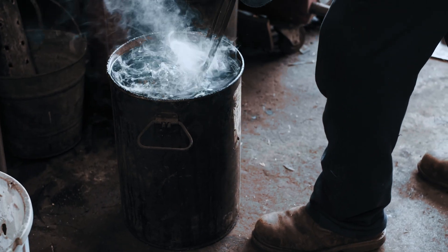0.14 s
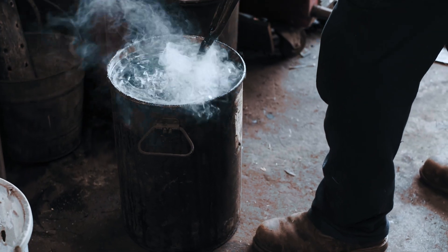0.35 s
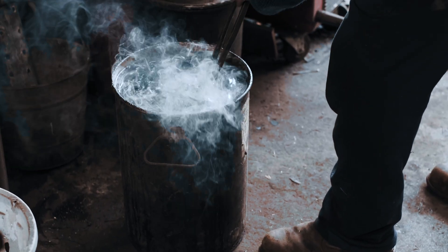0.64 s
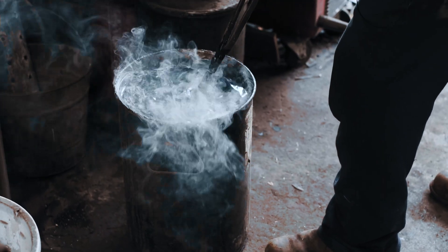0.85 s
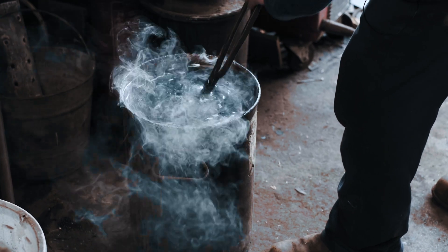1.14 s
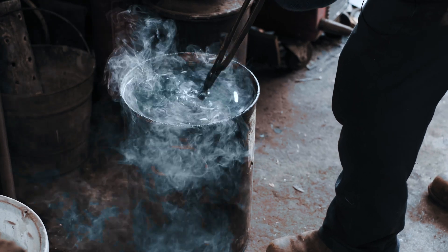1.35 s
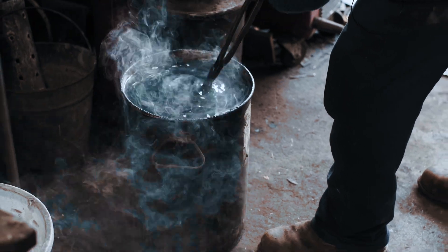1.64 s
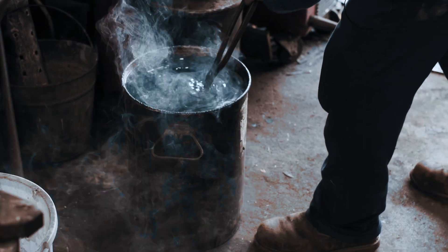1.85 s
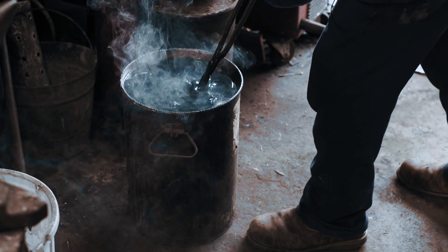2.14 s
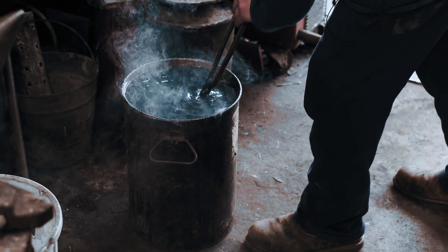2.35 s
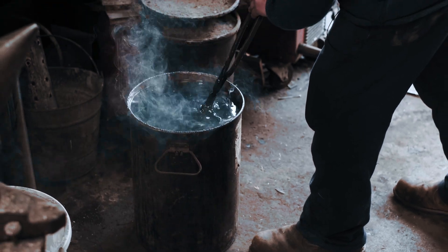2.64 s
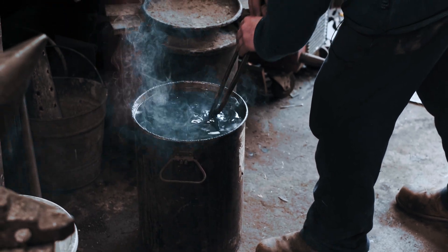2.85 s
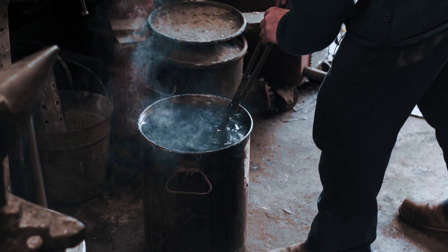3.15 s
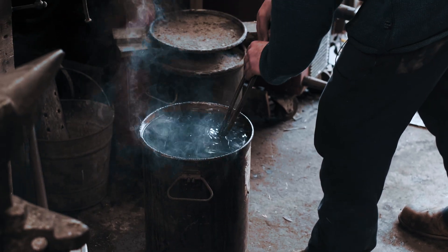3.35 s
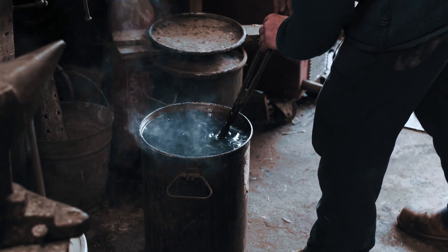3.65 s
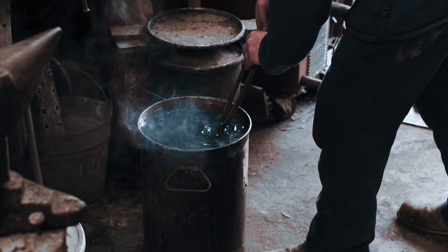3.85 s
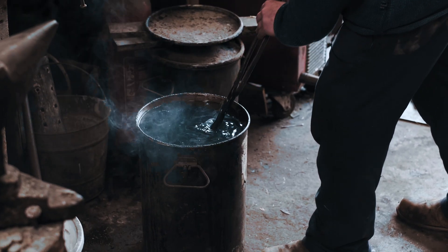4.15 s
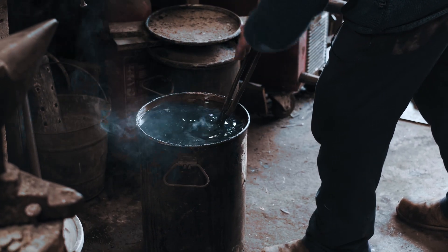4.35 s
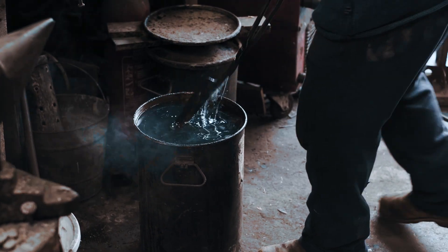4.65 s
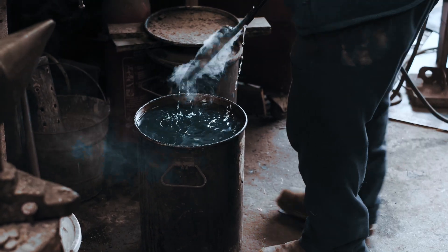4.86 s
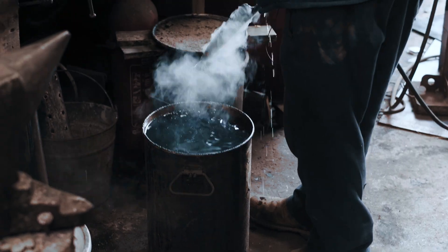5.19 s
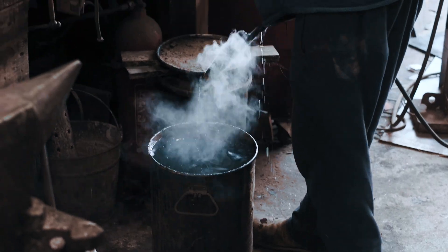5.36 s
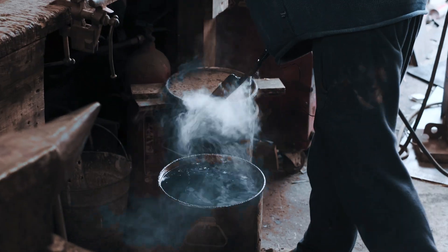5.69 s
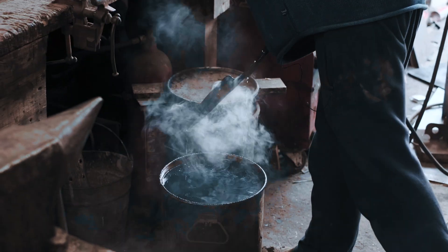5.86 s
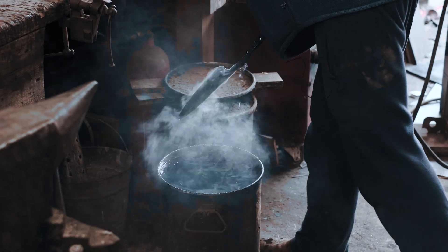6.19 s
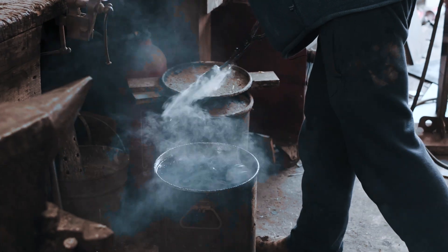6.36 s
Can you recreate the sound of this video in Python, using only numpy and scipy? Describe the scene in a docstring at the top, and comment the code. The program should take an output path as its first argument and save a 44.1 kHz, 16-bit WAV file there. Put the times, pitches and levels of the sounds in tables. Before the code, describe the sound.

A hot steel blade quenched in a drum of oil bubbles, crackles and pops sharply in a workshop, then a hard wooden knock bounces close by.

```python
"""A hot steel blade is stirred in a steel drum of oil in a workshop. A bright spray stops short, then the oil boils
and rumbles: noise shakes the drum's low modes and rising notes bubble. Vapour pockets crackle and pop, ringing
the oil, the steel and the room; the oil's own notes climb as the vapour clears. The blade is lifted and drops
of oil chirp as they fall back. Last, wood is knocked hard close by and bounces. Dull thuds, a blow on the drum,
a splash, shifting feet, room rumble and microphone hiss lie beneath; a gain control turns loud moments down."""
import sys
import numpy as np
from scipy import signal
from scipy.fft import rfft, irfft, next_fast_len
from scipy.io import wavfile
from scipy.ndimage import uniform_filter1d, map_coordinates

SR = 44100
rng = np.random.default_rng(int(sys.argv[2]) if len(sys.argv) > 2 else 0)


def gain_from_decibels(decibels):
    """Convert decibel values to linear amplitude factors."""
    exponent = np.asarray(decibels, float) / 20
    return 10 ** exponent


def unload_audio(sound):
    """Save the sound as a 16-bit wav file, at the path given as the first command line argument."""
    columns = np.transpose(np.atleast_2d(sound))
    # keep every value between -1 and 1, then stretch to whole-number steps
    steps = np.round(np.clip(columns, -1, 1) * 32767)
    wavfile.write(sys.argv[1], SR, steps.astype(np.int16))


N = 287695  # length in samples

# All levels are those ahead of the gain control.
# vapour pockets collapsing at set times, strong and faint, and one low drip-like blip at 4.314 s:
# (t/s, peak level/dB, f/Hz of its own ring)
TIMED_POPS = [(0.101, -34.5, 7976), (0.457, -36, 3390), (0.913, -33, 3040), (1.183, -37, 2620),
              (1.351, -28.5, 3800), (1.45, -30.5, 3120), (1.505, -26.5, 4900), (1.6395, -30.5, 8350),
              (1.7897, -27, 4400), (1.85, -29.5, 4200), (1.956, -36, 6600), (1.9758, -29.5, 8400),
              (2.002, -28.5, 5230), (2.0486, -33, 6400), (2.103, -28, 6246), (2.1527, -33, 6050),
              (2.203, -29.5, 7987), (2.228, -32, 8100), (2.2408, -27, 3100), (2.335, -32, 6444),
              (2.344, -37.5, 3200), (2.4035, -23, 3700), (2.5171, -24, 3590), (2.587, -30, 5200),
              (2.5905, -27, 3640), (2.6438, -32, 8220), (2.6562, -23.5, 3685), (2.671, -31, 4946),
              (2.687, -36, 3700), (2.707, -32.5, 8100), (2.7698, -27, 3920), (2.821, -29.5, 3760),
              (2.8573, -23.5, 8000), (2.895, -28, 8746), (2.913, -30, 7800), (2.966, -26.5, 6266),
              (3.0005, -43, 3708), (3.0688, -26, 5540), (3.1308, -29.5, 3960), (3.152, -32.5, 10750),
              (3.222, -31.5, 5900), (3.233, -24.5, 8107), (3.277, -27.5, 8400), (3.3194, -35, 3938),
              (3.3618, -36.5, 10000), (3.393, -32, 10400), (3.4664, -32, 8800), (3.515, -30.5, 10800),
              (3.561, -30.5, 6411), (3.609, -25.5, 8057), (3.7016, -21, 5280), (3.716, -45, 8200),
              (3.7318, -26.5, 8000), (3.781, -47, 6283), (3.8043, -36, 8000), (3.8134, -28.5, 3130),
              (3.924, -27, 4220), (3.945, -33, 6650), (3.9723, -31.5, 8500), (4.006, -34.5, 11000),
              (4.131, -37.5, 11900), (4.172, -38, 6850), (4.193, -34, 9500), (4.279, -41, 8700),
              (4.314, -44, 2330), (4.335, -41, 7800), (4.4295, -21.5, 5450), (4.452, -37, 5455),
              (4.491, -52, 5262), (4.584, -46.5, 5288)]
# fixed rings of drum and blade: (f/Hz, level/dB, t60/s)
STEEL_RINGS = [(5500, -8, .012), (6100, -8, .012), (7800, -7, .012), (8300, -7, .012), (10600, -11, .012)]
# low modes of the drum wall: (f/Hz, width/Hz)
DRUM_MODES = [(465, 20), (565, 24), (718, 13), (1305, 27)]
# how the oil moves: (t/s, level/dB of boiling and running oil, level/dB of the sizzle)
OIL_FLOW = [(0, -52, -52), (.2, -48.5, -62), (.5, -47, -49), (1, -51, -53.5), (1.4, -56.5, -48.5),
            (1.8, -59, -56), (2.6, -57, -76), (4.4, -56.5, -76.5), (4.8, -56.5, -63.5), (5.1, -52, -68),
            (5.52, -50.5, -55.5), (5.8, -51, -76), (6.52, -51, -52.5)]


def unit(x):
    """Scales a sound to rms 1."""
    return x / np.sqrt(np.mean(x ** 2) + 1e-20)


def along(points, hz):
    """Reads a curve of (f/Hz, value) points on a log frequency axis."""
    f, v = np.transpose(points)
    return np.interp(np.log(hz + 1), np.log(f + 1), v)


def curves(rows):
    """Gives one value per sample for each column after the time."""
    s, *columns = np.transpose(rows)
    return [np.interp(np.arange(N) / SR, s, column) for column in columns]


def wobble(rate):
    """Makes a smooth random curve with rate knots a second."""
    knots = rng.standard_normal(int(N * rate / SR) + 4)
    return map_coordinates(knots, [np.arange(N) * rate / SR])


def filtered(x, response):
    """Multiplies the spectrum of x by a complex response of frequency."""
    m = next_fast_len(x.shape[-1] + 8192)
    spectrum = rfft(x, m) * response(np.fft.rfftfreq(m, 1 / SR))
    return irfft(spectrum, m)[..., :x.shape[-1]]


def band(x, low_hz, high_hz):
    """Keeps a band of frequencies, with a steep lower edge and a gentle upper one."""
    x = signal.sosfilt(signal.butter(5, low_hz, "high", fs=SR, output="sos"), x)
    return signal.lfilter(*signal.butter(1, min(high_hz, SR / 2.2), fs=SR), x)


def rush(spectrum, patchy_db):
    """Makes noise of rms 1 whose gain varies in random patches of time and frequency."""
    z = signal.stft(rng.standard_normal(N), nperseg=512)[2]
    field = uniform_filter1d(rng.standard_normal(z.shape), size=5, axis=0)
    field = uniform_filter1d(field, size=10, axis=1)
    noise = signal.istft(z * gain_from_decibels(patchy_db * unit(field)), nperseg=512)[1][:N]
    return unit(filtered(noise, lambda hz: gain_from_decibels(along(spectrum, hz))))


def ring(modes, t, scatter_db, scatter_rad=1.9):
    """Adds up dying sines, struck at new strengths and phases each time."""
    hz, db, t60 = np.transpose(modes)[:, :, None]
    luck = rng.standard_normal((2, len(modes), 1))
    strength = gain_from_decibels(db + scatter_db * luck[0] - 60 * t / t60)
    return np.sum(strength * np.sin(2 * np.pi * hz * t + scatter_rad * luck[1]), axis=0)


def add(track, s, peak_db, sound):
    """Lays a sound in at time s with the given peak."""
    start = round(s * SR)
    track[start:start + len(sound)] += gain_from_decibels(peak_db) * sound[:len(track) - start] / np.abs(sound).max()


def shop(x):
    """The workshop's answer: a delayed noise tail in which each frequency dies at its own speed."""
    # (f/Hz, t60/s)
    shop_decay = [(150, 0.48), (1000, 0.52), (4000, 0.22), (12000, 0.16)]
    hz, t, z = signal.stft(rng.standard_normal(SR // 2), SR, nperseg=256)
    tail = signal.istft(z * gain_from_decibels(-60 * t / along(shop_decay, hz)[:, None]), SR, nperseg=256)[1]
    delayed = np.pad(x, (SR // 150, 0))
    return signal.fftconvolve(delayed, tail / np.linalg.norm(tail))[:len(x)]


def clearing(s):
    """How far the vapour has cleared at time s, from 0 to 1."""
    clears_at_s, clears_in_s = 2.1, .75
    return 1 - np.exp(-np.maximum(s - clears_at_s, 0) / clears_in_s)


def oil_modes(s):
    """Modes of the oil-filled drum at time s, as (f/Hz, level/dB, t60/s); foam lowers and muffles them."""
    # (multiple of the lowest mode, level/dB in clear oil)
    oil_ratios = [(1, -4), (1.19, -3), (1.5, -9)]
    foamy_hz, clear_hz = 2780, 4390
    foamy_t60, clear_t60 = .024, .066  # s
    clear = clearing(s)
    lowest_hz = foamy_hz + (clear_hz - foamy_hz) * clear
    t60 = foamy_t60 + (clear_t60 - foamy_t60) * clear ** 3
    return [(k * lowest_hz, db - 100 * (k - 1) * (1 - clear), t60) for k, db in oil_ratios]


def oil_ring(x, t60):
    """Passes x through the oil's modes while they glide upward."""
    pole, out = gain_from_decibels(-60 / (t60 * SR)), 0
    for hz, db, _ in oil_modes(np.arange(N) / SR):
        turn = np.exp(2j * np.pi * np.cumsum(hz) / SR)
        # shift the mode down to 0 Hz, let it ring there, then shift it back
        rung = signal.lfilter([np.sqrt(1 - pole)], [1, -pole], x / turn)
        out = out + gain_from_decibels(db) * np.real(turn * rung)
    return out


def pop(s, own_hz):
    """One vapour pocket collapses: a snap and spray, its own ring, the oil's modes and the steel."""
    t = np.arange(SR // 8) / SR
    # the pocket stirs most the oil modes near its own pitch
    oil = [(hz, db - 18 * abs(np.log10(hz / own_hz)), t60) for hz, db, t60 in oil_modes(s)]
    # a ragged push of 5 ms roughens the rings
    shove = rng.standard_normal(SR // 200) * gain_from_decibels(-60 * t[:SR // 200] / 0.017)
    rings = ring(STEEL_RINGS + [(own_hz, 1.5, .014)], t, scatter_db=3.5)
    rings = signal.fftconvolve(rings, shove / np.linalg.norm(shove))[:len(t)]
    # three decays: snap, spray and a faint tail
    fade = gain_from_decibels(12.5 - 60 * t / .004) + gain_from_decibels(6.5 - 60 * t / .016) + gain_from_decibels(-9 - 60 * t / .05)
    crack = band(rng.standard_normal(len(t)) * fade, 0.66 * own_hz, 1.2 * own_hz)
    crack = (crack + ring(oil, t, scatter_db=2)) * (1 - np.exp(-t / .0004))
    return band(rings + crack, .85 * min(own_hz, oil[0][0]), 2 * own_hz)


def chance_pops(count):
    """Draws more collapses: some by chance early on, and three shaken loose by each timed one."""
    until_s, early_db, scatter_db = 1.5, -43, 4
    middle_hz, spread = 8000, 0.285
    after_s, after_db = .022, -16  # mean extra delay and relative level of those shaken loose
    timed = np.repeat(TIMED_POPS, 3, axis=0)
    early = (np.arange(count) + rng.random(count)) / count * until_s
    when = np.r_[early, timed[:, 0] + .008 + rng.exponential(after_s, len(timed))]
    luck = rng.standard_normal((len(when), 2))
    db = np.r_[np.full(count, early_db), timed[:, 1] + after_db] + scatter_db * luck[:, 0]
    hz = np.clip(middle_hz * np.exp(spread * luck[:, 1]), 2500, 12000)
    return list(zip(when, db, hz))


def crackle():
    """Small pockets burst in clumps as short ticks, raised around each timed pop by that pop's strength."""
    # (t/s, base level/dB of the ticks before filtering)
    tick_level = [(0, -57.5), (1, -49), (2, -47.5), (3.5, -54), (4.4, -67), (5.5, -52), (6.52, -90)]
    blade_out_s = 4.62  # the blade leaves the oil and its ticks no longer ring the oil
    time = np.arange(N) / SR
    stir = 0
    for s, db, _ in TIMED_POPS:
        distance = np.where(time > s, (time - s) / 0.0064, (s - time) / 0.0017)
        stir = stir + gain_from_decibels(db + 55.0) * np.exp(-distance)
    level_db = curves(tick_level)[0] + 11 * np.log10(1 + stir)
    ticks_so_far = np.cumsum(380 * gain_from_decibels(5.1 * wobble(14))) / SR
    luck, t = rng.random((3500, 3)), np.arange(SR // 80) / SR
    track = np.zeros(N)
    for k in range(min(int(ticks_so_far[-1]), len(luck))):
        at = np.searchsorted(ticks_so_far, k + luck[k, 0])
        steel_hz = STEEL_RINGS[int(luck[k, 2] * len(STEEL_RINGS))][0]
        hz = steel_hz * rng.normal(1.077, 0.11)
        tone = np.sin(2 * np.pi * hz * t) * gain_from_decibels(-60 * t * hz / 18)
        snap = 0.89 * rng.standard_normal(len(t)) * gain_from_decibels(-60 * t / 0.0015)
        add(track, at / SR, level_db[at] - 6.5 * np.log(luck[k, 1] + .05), tone + snap)
    track = band(track, 3270, 12500)
    return track + gain_from_decibels(-6) * oil_ring(track * (time < blade_out_s), t60=.03)


def pops():
    """Timed and chance collapses sound over the crackle, and the room answers them all."""
    track = crackle()
    for s, db, hz in TIMED_POPS + chance_pops(count=34):
        add(track, s, db, pop(s, hz))
    return track + gain_from_decibels(-13.0) * shop(track)


def boiling():
    """Churning and running oil: low noise that swells unevenly."""
    # (f/Hz, level/dB per Hz)
    boil_colour = [(88, -112), (150, -7), (216, -10.5), (306, 0.5), (370, -13), (458, -2.5), (1060, 0.5),
                   (3000, -19.5), (6600, -120)]
    boil_db = curves(OIL_FLOW)[0]
    return gain_from_decibels(boil_db + 1.711 * wobble(8.4)) * rush(boil_colour, patchy_db=0.83)


def sizzle():
    """Fine sizzling: brighter noise that spits unevenly."""
    # (f/Hz, level/dB per Hz, before the spitting)
    sizzle_colour = [(1060, 4.5), (1800, 8), (2350, -2), (3200, 5.5), (4200, -2), (5800, 1.5), (7200, -2),
                     (8300, 1), (9500, -8), (16900, -9)]
    sizzle_db = curves(OIL_FLOW)[1]
    spitting = unit(gain_from_decibels(4 * wobble(150)) * rush(sizzle_colour, patchy_db=3.5))
    return gain_from_decibels(sizzle_db + 1.5 * wobble(8)) * spitting


def hum_db():
    """Levels of the drum's lowest mode, which peaks once, and of the upper ones, which fade, then stop."""
    surge_s, surge_db, rise_db_per_s, fall_db_per_s = 0.2, -46, 100, 69
    upper_db, fade_db_per_s, end_s, end_db_per_s = -51, 7.5, 1.15, 76  # the end slope adds to the fade
    s = np.arange(N) / SR
    low = surge_db - rise_db_per_s * np.maximum(surge_s - s, 0) - fall_db_per_s * np.maximum(s - surge_s, 0)
    return low, upper_db - fade_db_per_s * s - end_db_per_s * np.maximum(s - end_s, 0)


def drum_mode(f, center, width):
    """How strongly one mode of the drum wall answers at frequency f."""
    return 1j * f * width / (center * center - f * f + 1j * f * width)


def drum_hum():
    """Lumpy boiling noise shakes the low modes of the drum wall."""
    low_db, high_db = hum_db()
    hum = 0
    for (hz, width), db in zip(DRUM_MODES, [low_db, high_db - 0.5, high_db + 0.5, high_db - 2.5]):
        lumps = gain_from_decibels(3.1 * wobble(26.0)) * rng.standard_normal(N)
        hum = hum + gain_from_decibels(db) * unit(filtered(lumps, lambda f: drum_mode(f, hz, width)))
    return hum


def bubbling():
    """Vapour bubbles leave the hot steel as short rising notes that follow the upper drum hum's level."""
    s, size, strength = rng.random((3, 700, 1))
    s, hz, t = 1.6 * s, 450 * 3.18 ** size, np.arange(SR // 40) / SR
    fade = gain_from_decibels(-4.5 * np.log(strength + 0.061) - 60 * t * hz / 22)
    notes = fade * np.sin(2 * np.pi * hz * t * (1 + 6 * t))
    at = (s * SR).astype(int) + np.arange(len(t))
    return gain_from_decibels(hum_db()[1]) * np.bincount(at.ravel(), unit(notes).ravel() / 2.866, N)


def spray():
    """Oil thrown up by the first violent boil: bright noise that stops short."""
    # (f/Hz, level/dB per Hz)
    spray_colour = [(3000, -27), (10000, -5.5), (17000, -9.5)]
    level_db, ends_s, stops_in_s = -45.5, 0.065, 0.0036
    stop = np.clip((ends_s - np.arange(N) / SR) / stops_in_s, 0, 1)
    return gain_from_decibels(level_db + 4.393 * wobble(69)) * stop * rush(spray_colour, patchy_db=3.0)


def drips():
    """Each drop falling into the oil traps a bubble whose pitch rises as it nears the surface."""
    # (t/s, peak level/dB, nominal f/Hz of the bubble)
    drops = [(0.104, -36.5, 1180), (1.025, -37, 1297), (2.861, -39, 1533), (4.796, -41.5, 1315),
             (4.912, -36.5, 1708), (4.926, -40, 1869), (4.995, -40, 1173), (5.011, -38.5, 1090),
             (5.04, -41.5, 1750)]
    track, t = np.zeros(N), np.arange(SR // 10) / SR
    for s, db, hz in drops:
        tone = np.sin(2 * np.pi * hz * t * (0.98 + 1.5 * t))
        add(track, s, db, tone * gain_from_decibels(-60 * t * hz / 45) * (1 - np.exp(-t / 0.0007)))
    return track + gain_from_decibels(-7.5) * shop(track)


def knock():
    """A hard blow on wood and its bounces: ringing modes, a dull splintery burst and a bright crack."""
    # blow and bounces: (t/s, peak level/dB, crack level/dB relative to the peak before the 10 dB lift below)
    blows = [(6.1633, -1, -17.5), (6.175, -17, -41), (6.2387, -12.5, -25.5), (6.2539, -15, -47)]
    # modes of the wood: (f/Hz, level/dB, t60/s)
    wood_modes = [(133.66, -19.5, 0.14), (226, -9.5, 0.079), (294, 1, 0.054), (373, 3.5, 0.028),
                  (556, -9.5, 0.081), (784, -6, 0.045), (986, -6, 0.029), (1200, 2, 0.016),
                  (1516, -5, 0.022)]
    track, t = np.zeros(N), np.arange(SR // 3) / SR
    for s, db, crack_db in blows:
        wood = ring(wood_modes, t, scatter_db=0.5, scatter_rad=0.29) * (1 - np.exp(-t / 0.0016))
        add(track, s, db, wood)
        splinter = band(band(rng.standard_normal(len(t)), 186, 760), 135, 940)
        add(track, s, db - 14.0, splinter * gain_from_decibels(-60 * t / 0.097))
        crack = band(rng.standard_normal(len(t)), 1200, 2500)
        add(track, s, db + crack_db + 10, crack * gain_from_decibels(-60 * t / .02) * (1 - np.exp(-t / .002)))
    return band(track + gain_from_decibels(-13.5) * shop(track), 91, 7800)


def thuds():
    """Dull thuds, a blow on the drum and a splash: dying noise, some brighter, with the drum wall."""
    # (t/s, peak level/dB, brightness/dB, t60/s)
    thumps = [(1.502, -26.5, -4, 0.59), (2.427, -38, -10, 0.412), (2.556, -32.5, -22.5, 0.24),
              (4.99, -39.5, 4, 1)]
    track, t = np.zeros(N), np.arange(SR // 2) / SR
    for s, db, bright_db, t60 in thumps:
        colour = [(60, -48.5), (150, -15.0), (350, -1), (600, bright_db / 2), (1300, bright_db),
                  (3000, bright_db - 12.0), (9000, bright_db - 21.5)]  # (f/Hz, level/dB)

        def response(f):
            """The burst's colour with the drum wall joining in."""
            return gain_from_decibels(along(colour, f)) * (1 + 1.25 * sum(drum_mode(f, c, w) for c, w in DRUM_MODES))

        burst = filtered(rng.standard_normal(len(t)), response)
        add(track, s, db, burst * gain_from_decibels(-60 * t / t60) * (1 - np.exp(-t / 0.0002676)))
    return track


def steps():
    """Feet shift on the floor, which answers with low swells."""
    # (t/s, level/dB, half length/s)
    shifts = [(4.701, -48.5, 0.096), (5.154, -57.5, 0.22), (5.65, -58.5, 0.49)]
    # (f/Hz, level/dB per Hz)
    floor_colour = [(15, -39), (28, -4), (70, -3.5), (110, -14), (400, -80)]
    time = np.arange(N) / SR
    swell = sum(gain_from_decibels(db) * np.exp(-((time - s) / half) ** 2) for s, db, half in shifts)
    return swell * rush(floor_colour, patchy_db=0.0)


def room_rumble():
    """The workshop's low rumble: deep noise whose level wavers around -58 dB."""
    # (f/Hz, level/dB per Hz)
    rumble_colour = [(12, -32.5), (20, -2.5), (91, 5), (145, -1), (282, -2.5), (400, -5), (520, -28),
                     (880, -120)]
    return gain_from_decibels(-58 + 3.8 * wobble(5.044)) * rush(rumble_colour, patchy_db=0.5)


def microphone_hiss():
    """The microphone's own noise: a bright hiss at -62 dB."""
    # (f/Hz, level/dB per Hz)
    hiss_colour = [(1500, -53.5), (3000, 1), (12000, 7.5), (17000, 4)]
    return gain_from_decibels(-62) * rush(hiss_colour, patchy_db=1.0)


def scene():
    """Adds everything up at one microphone."""
    oil = pops() + boiling() + sizzle() + drum_hum() + bubbling() + spray() + drips()
    others = knock() + thuds() + steps() + room_rumble()
    return (oil + others + microphone_hiss())[None]


def band_limit(x):
    """A steep low-pass at the top of the band."""
    return signal.sosfilt(signal.butter(12, 16700, fs=SR, output="sos"), x)


def record(dry):
    """Gain control turns the level down as the running loudness grows; the highest peaks clip softly."""
    power = signal.lfilter([1 / 6000], [1, 1 / 6000 - 1], dry ** 2)  # averaged over about 6000 samples
    loudness = np.sqrt(np.abs(power))
    ducked = dry / (1 + (loudness / 0.0075) ** 0.52) ** 0.54
    clipped = ducked / (1 + np.abs(ducked / .31) ** 8) ** (1 / 8)
    return band_limit(clipped)


dry = scene()
out = record(dry)
unload_audio(out)
```